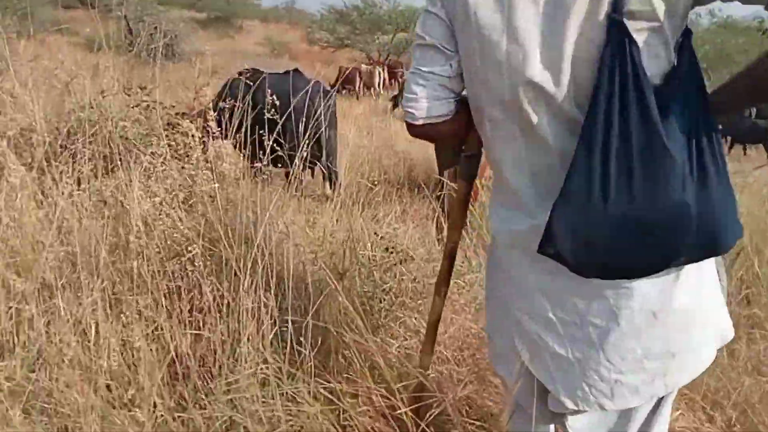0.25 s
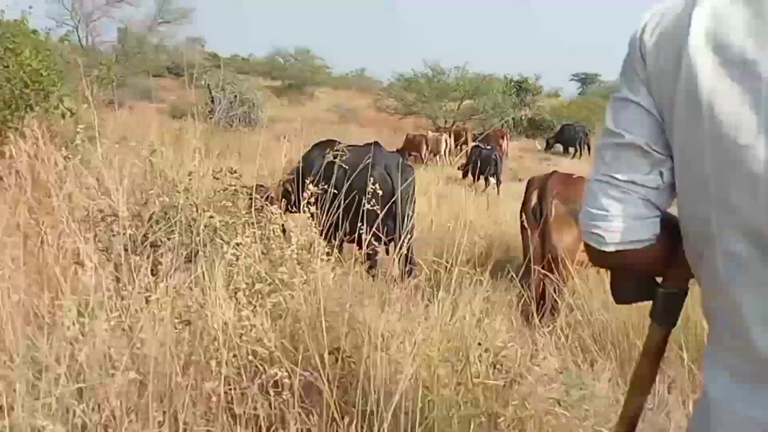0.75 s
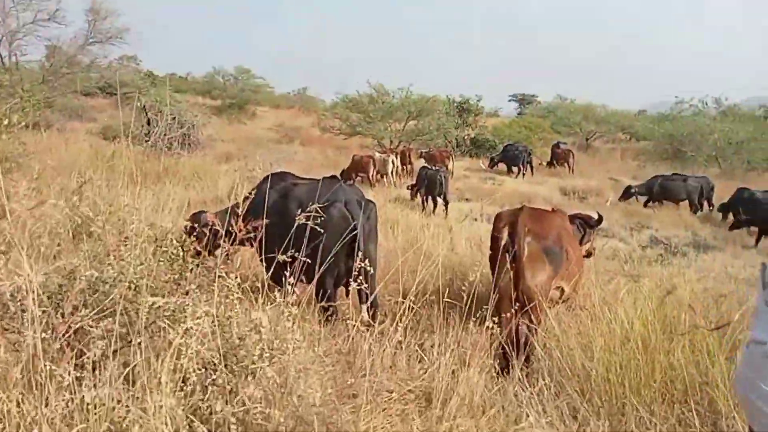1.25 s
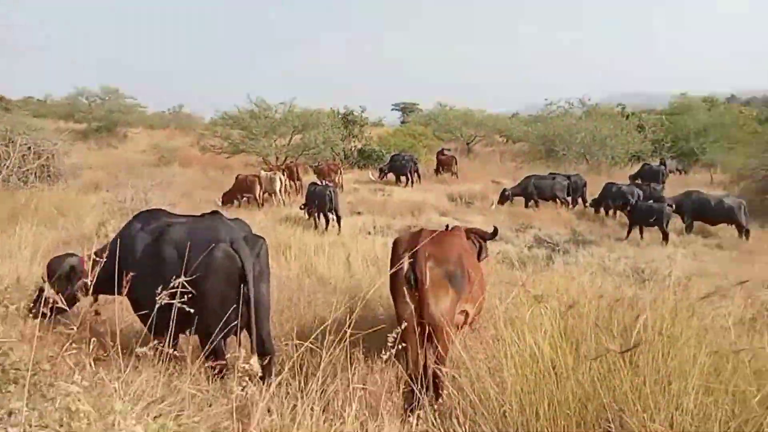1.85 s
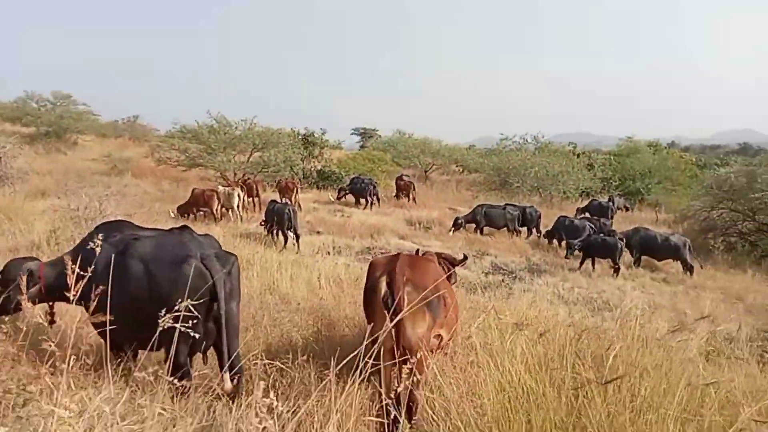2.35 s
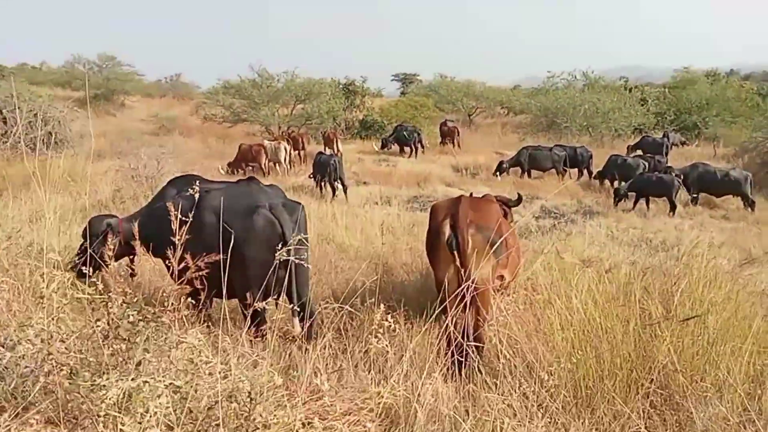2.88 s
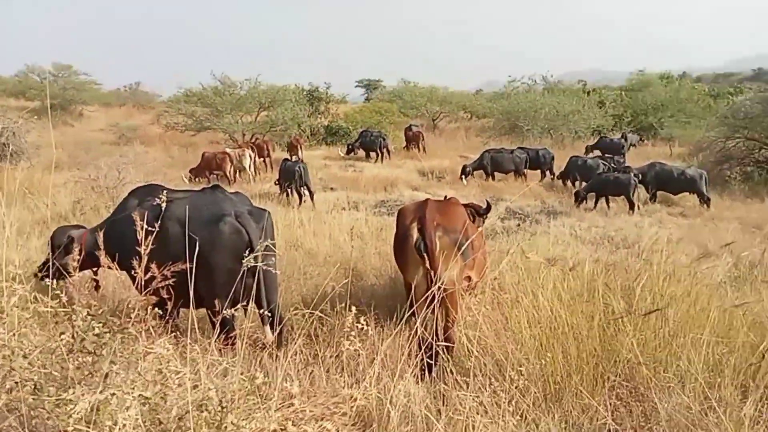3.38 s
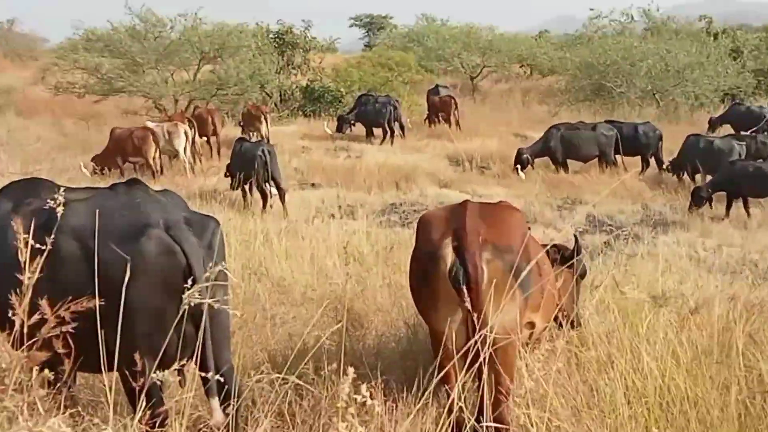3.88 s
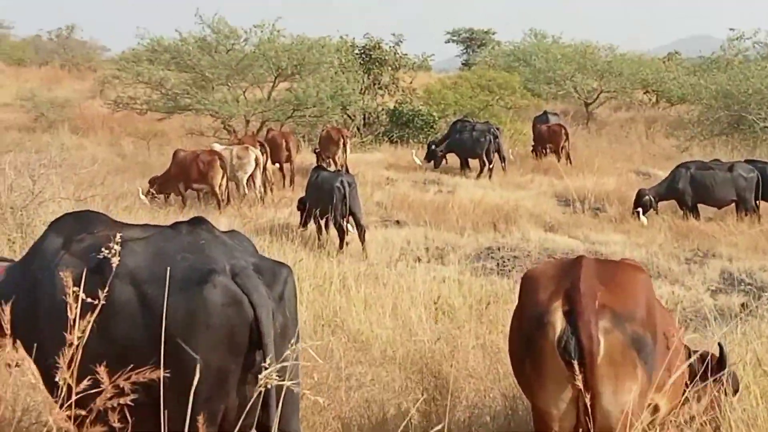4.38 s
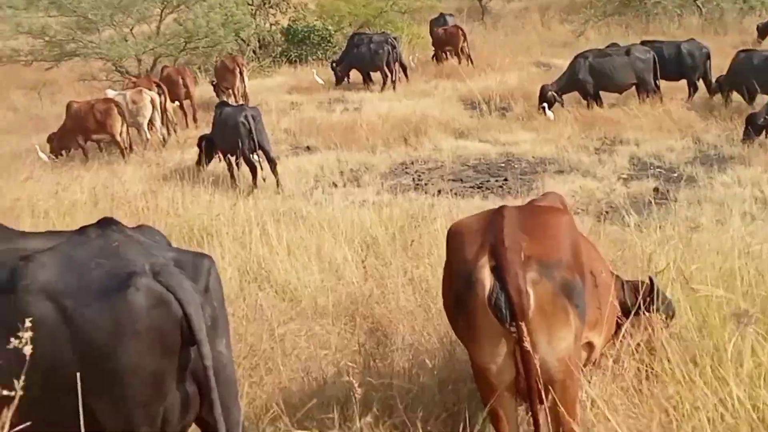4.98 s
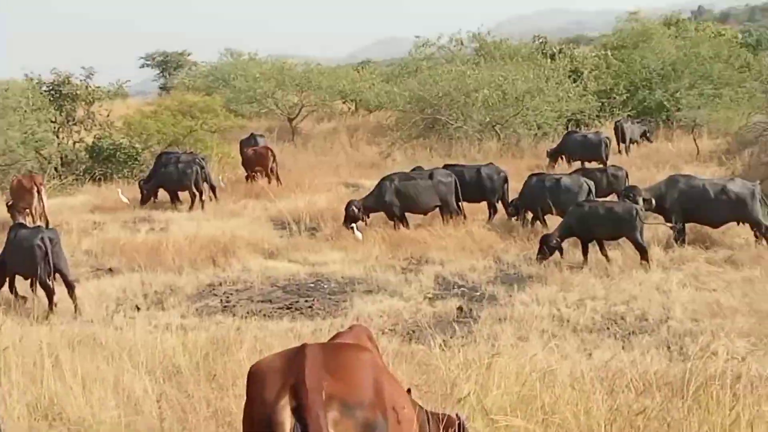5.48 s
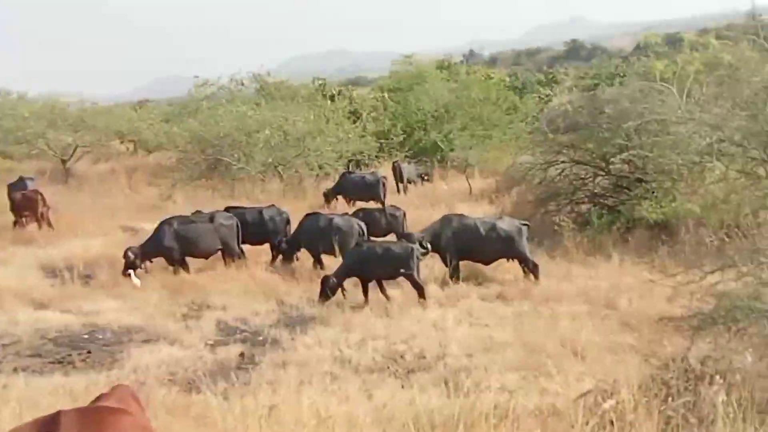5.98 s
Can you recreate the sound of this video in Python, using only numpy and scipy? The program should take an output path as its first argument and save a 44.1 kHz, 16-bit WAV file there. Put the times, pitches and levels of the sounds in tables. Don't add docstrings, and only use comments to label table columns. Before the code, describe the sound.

In an open dry pasture, brittle stalks rustle and snap around a walker's legs, while a fainter grass hiss suggests animals and another walker further off. Wind bumps come right at the start, brisk swishes follow, then a quieter stretch, and finally denser crackling, sharp stem ticks, dull treads and low puffs. The single microphone is close, dry and bright, essentially mono, with no animal calls.

```python
import sys
import numpy as np
from scipy import signal
from scipy.fft import rfft, irfft
from scipy.io import wavfile
from scipy.ndimage import uniform_filter1d

SR = 44100
rng = np.random.default_rng(int(sys.argv[2]) if len(sys.argv) > 2 else 0)


def digitize_waveform(pressure):
    field = np.atleast_2d(pressure).T
    bounded = np.clip(field, -1, 1)
    quanta = np.round(bounded * 32767).astype(np.int16)
    wavfile.write(sys.argv[1], SR, quanta)


def voltage_ratio(level):
    return 10 ** (np.asarray(level, float) / 20)


N = 274743


def evened(x):
    return x / np.sqrt(np.mean(x ** 2) + 1e-20)


def read(points, hz):
    f, value = np.transpose(points)
    return np.interp(np.log(hz + 1), np.log(f + 1), value)


def add(mix, s, sound):
    part = mix[round(s * SR):][:len(sound)]
    part += sound[:len(part)]


def drift(shape, wide, long):
    field = uniform_filter1d(rng.standard_normal(shape), wide, 0)
    return evened(uniform_filter1d(field, long, 1))


def wind():
    # t/s, level/dB
    strength = [(0.0, -75), (0.12, -57), (0.33, -68.5), (0.5, -73), (0.99, -68.5), (1.54, -77), (1.77, -70),
                (2.24, -71), (2.5, -67.5), (2.85, -70), (3.16, -69.5), (3.42, -64.5), (3.75, -66.5),
                (4.15, -62.5), (4.56, -62), (4.89, -62), (5.03, -58), (5.21, -66.5), (6.23, -60)]
    # f/Hz, level/dB per Hz
    rumble_colour = [(15, -40), (30, -10), (50, -7), (85, 0), (165, -2), (300, -4.5), (420, -9), (600, -13),
                     (1000, -82)]
    # centre t/s, peak level/dB, f/Hz, length/ms
    puffs = [(0.01, -40, 94, 16), (0.049, -55, 110, 67), (0.084, -41.5, 133, 11), (0.177, -33.5, 127, 6.4),
             (0.199, -48, 120, 33), (1.048, -48, 92, 20), (1.287, -52, 187, 32), (2.378, -52, 215, 10),
             (2.77, -59, 95, 44), (3.498, -46.5, 69.5, 20), (3.88, -56.5, 177, 52), (4.2, -54, 131, 40),
             (4.269, -41.5, 96, 45), (4.292, -44, 95, 15), (4.461, -58, 113, 45), (4.641, -54, 161, 48),
             (4.743, -49, 197, 49), (4.76, -44, 195, 15), (4.79, -50, 200, 25), (4.814, -46, 110, 18),
             (4.838, -37.5, 117, 13), (4.97, -49, 119, 20), (5.014, -37.5, 127, 14), (5.038, -42, 122, 13),
             (5.07, -44, 84, 19), (5.415, -54, 70, 40), (5.806, -38, 146, 10), (5.851, -54, 151, 37),
             (5.963, -46, 85, 31), (6.142, -39, 100, 17), (6.189, -50, 110, 31), (0.114, -51, 100, 30),
             (.215, -48, 85, 20), (.235, -49, 80, 27), (.27, -57, 60, 50), (.335, -55, 110, 31),
             (1.55, -60, 80, 32), (1.9, -60.5, 169, 60), (4.862, -49, 105, 35), (.5, -60, 65, 60)]
    low = irfft(rfft(rng.standard_normal(N)) * voltage_ratio(read(rumble_colour, np.fft.rfftfreq(N, 1 / SR))), N)
    power = uniform_filter1d(uniform_filter1d(low ** 2, 3000), 3000)
    low = low / np.sqrt(power)
    t = np.arange(N) / SR
    lumps_db = 1.8 * drift((1, N), 1, 4000)[0]
    out = voltage_ratio(0.5) * evened(low) * voltage_ratio(np.interp(t, *np.transpose(strength)) + lumps_db)
    for (s, db, hz, ms), turn in zip(puffs, rng.random(len(puffs))):
        swell = np.exp(-((t - s) * 2500 / ms) ** 2)
        out += voltage_ratio(db) * swell * np.cos(2 * np.pi * (hz * (t - s) + turn))
    return signal.sosfilt(signal.butter(2, 35, "high", fs=SR, output="sos"), out)


def snaps(per_s, spread_db):
    size = voltage_ratio(spread_db * np.minimum(rng.exponential(1, N), 5)) * rng.choice([-1., 1.], N)
    return evened(size * (rng.random(N) < per_s / SR))


def crackle(count=8):
    place = np.sqrt(np.linspace(0, 1, N // 2 + 1)) * count
    own = 0
    for k in range(count + 1):
        band = np.cos(np.pi / 2 * np.clip(place - k, -1, 1))
        own = own + band * rfft(snaps(1500, 3.3))
    own = evened(irfft(own, N))
    echo = rng.standard_normal(400) * voltage_ratio(-np.arange(400) / SR * 60 / 0.0083 - 5.0)
    echo[0] = 1
    clicks = voltage_ratio(-13.5) * snaps(2500, 2.6) + voltage_ratio(-16.5) * own
    near = signal.oaconvolve(clicks, echo / np.linalg.norm(echo))[:N]
    tail = rng.standard_normal(1200) * voltage_ratio(-np.arange(1200) / SR * 60 / 0.033)
    stiff = evened(signal.oaconvolve(snaps(60, 0.88), tail)[:N])
    return near + voltage_ratio(-26.0) * stiff + voltage_ratio(-6.5) * rng.standard_normal(N)


def stirring(t):
    # t/s, level/dB, open path past the port peak/dB, tread/dB
    far_grass = [(0.03, -34, -1, 0.1), (0.34, -38.5, -1.4, 0.55), (0.47, -41.5, -0.8, -0.6),
                 (0.76, -36.5, -3, 1), (0.95, -35.5, -3, 0.4), (1.21, -36.5, 0, -0.4), (1.52, -68, -5, -1),
                 (1.9, -40.5, -0.2, 0.3), (2.2, -38.5, 2.3, -0.54), (2.52, -43.5, 1.5, -0.5),
                 (3.12, -45, 2, -0.77), (3.67, -55.5, 2.5, 0.95), (4.07, -44, -0.5, -0.5),
                 (4.58, -38.5, -4, 1.1), (5.13, -35, -4.5, 0.06), (5.44, -42, 0.5, -0.2),
                 (6.07, -41, -22, 0.5), (6.18, -36, 1, 1)]
    far_follow = [.22, .29, .52, 1, 1.06]
    far_open = [0.17, 0.9, 1.4, 0, 0.9]
    far_heavy = [5.5, 0.5, 2.5, -4, -4]
    far_offset = [-2.94, 1, -1.13, 0.35, -0.66]
    # peak t/s, blades level/dB, length/ms, tips over blades/dB, leaves over blades/dB
    sweeps = [(0.124, -38, 74, -2.0, 1), (0.69, -38.5, 180, 0, -4.5), (0.85, -36.5, 78, -2, -5.5),
              (0.93, -32.5, 110, 1.3, -3.5), (1.04, -37, 120, -3, -4.5), (1.277, -31.5, 88, -3, -3.5),
              (1.483, -36, 310, -2.4, -3), (1.763, -33, 73, 4, -7), (1.943, -46, 200, 10, 5),
              (2.3, -44, 48, 8, 2), (2.43, -37.5, 30, 6, -6), (2.478, -31, 72, 5, -7),
              (2.52, -35.5, 45, 5, -5), (2.565, -42, 60, 1, -4), (2.812, -43, 12, -3.9, -5),
              (2.7, -49, 45, 0, 2), (3.265, -46, 37, 2, 6), (3.33, -41.5, 86, 1, 1.5),
              (3.59, -38, 250, -2.5, -2.8), (3.72, -45, 40, -3, -6), (3.89, -43.5, 75, -7, 4),
              (4.053, -44, 95, -3, 4.5), (4.235, -44.5, 60, -12, 6.5), (4.3, -38, 150, -14, -0.5),
              (4.432, -43.5, 46, -3, 3), (4.614, -34.5, 120, -2, -4.5), (4.77, -37.5, 72, -8, -3),
              (4.856, -33, 32, 1, 1), (4.9, -36, 168, 6.5, 5.5), (5.04, -38, 40, -4, -6),
              (5.1, -36.5, 97, -10, -5), (5.234, -42, 93, 3, 8.5), (5.38, -36, 56, -7, -2),
              (5.564, -44, 122, 12, 11.5), (5.832, -41.5, 194, 9.5, 9), (6.13, -40, 18, 0, -5),
              (6.167, -40, 74, 5, 2)]
    at, level, opening, tread = np.transpose(far_grass)
    mean_db = -38
    far_db = mean_db + np.outer(far_follow, np.interp(t, at, level) - mean_db)
    far_db += np.outer(far_open, np.interp(t, at, opening))
    far_db += np.outer(far_heavy, np.interp(t, at, tread))
    far_db += np.reshape(far_offset, (-1, 1))

    s, db, ms, tips_db, leaves_db = np.transpose(sweeps)
    u = (t - s[:, None]) * 1000 / ms[:, None]
    settle = 0.69 * (ms[:, None] / 100)
    swell = np.exp(-2 * abs(np.where(u > 0, u / settle, u)) ** 1.6)
    litter_db = 0.17 * leaves_db - 6
    stems_db = 0.55 * leaves_db + 1.55
    near_db = db + np.array([litter_db, stems_db, leaves_db, 0 * db, tips_db])
    return 10 * np.log10(voltage_ratio(far_db) ** 2 + voltage_ratio(near_db) ** 2 @ swell)


def grass():
    # f/Hz, level/dB per Hz
    grass_colour = [(100, -6.5), (230, -17.5), (680, -14), (1350, -15.5), (2200, -12.5), (4200, -11.5),
                    (5300, -5), (6700, -7.5), (7900, -3.5), (9300, 1), (10300, -2.5), (11600, -5.5),
                    (13300, -5), (15600, -6)]
    layer_hz = [600, 1800, 5200, 9300, 13700]
    # t/s, f/Hz, height over its usual level/dB
    port_peak = [(0, 9750, -4.3), (.3, 9700, -1), (.5, 10000, -0.5), (.7, 9300, -1), (.92, 10000, 1.7),
                 (1.15, 10300, -3), (1.55, 9100, 1), (2.0, 10000, -5), (2.45, 9100, 1.4), (2.95, 9400, 1.4),
                 (3.4, 9700, 1.1), (3.85, 9497, -0.5), (4.3, 9400, -1.1), (4.9, 9460, -0.7),
                 (5.3, 8800, 1.8), (5.75, 9940, 4.1), (6.0, 9800, 1.8), (6.23, 9400, 2.5)]
    hz, t, z = signal.stft(crackle(), SR, nperseg=256, noverlap=192)
    z = z / np.sqrt((abs(z) ** 2).mean(1, keepdims=True))
    layers = stirring(t)
    weights = np.transpose([np.interp(hz, layer_hz, row) for row in np.eye(5)])

    at, peak_hz, height_db = np.transpose(port_peak)
    peak_hz = np.interp(t, at, peak_hz)
    port_width_hz = 900
    bump = np.exp(-((hz[:, None] - peak_hz) / port_width_hz) ** 2)
    height_db = np.interp(t, at, height_db) * bump
    slide = (layer_hz[3] - peak_hz) * np.exp(-((hz[:, None] - layer_hz[3]) / 2500) ** 2)

    patches = 0.85 * drift(z.shape, 6, 40) + 0.5 * drift(z.shape, 90, 9)
    patches += 0.6 * drift(z.shape, 250, 16) + 1.5 * drift(z.shape, 2, 45)
    z = z * voltage_ratio(read(grass_colour, hz[:, None] + slide) + height_db + patches)
    band = (hz > 7000) & (hz < 12000)
    z /= np.sqrt(4 / 3 * (abs(z[band]) ** 2).sum(0).mean())
    z *= voltage_ratio(weights @ layers)
    rustle = voltage_ratio(-2.5) * signal.istft(z, SR, nperseg=256, noverlap=192)[1][:N]
    return signal.sosfilt(signal.butter(3, 170, "high", fs=SR, output="sos"), rustle)


def knocks():
    # t/s, peak level/dB, f/Hz, ring time/ms
    blows = [(0.1007, -39, 870, 16), (.257, -48.5, 640, 46), (.98, -49, 670, 57), (1.2795, -38, 1290, 13),
             (1.284, -44, 1700, 12), (1.291, -52, 700, 9.2), (1.331, -45, 1180, 93),
             (1.755, -44.5, 930, 44), (2.4833, -37, 900, 8), (2.4853, -39, 805, 6.8),
             (2.4898, -31, 1000, 5), (2.4944, -33, 970, 8.5), (2.4983, -40, 1500, 8),
             (3.444, -41.5, 368, 35), (3.479, -42.5, 1140, 10), (3.527, -44, 417, 21),
             (3.589, -41, 1300, 23), (3.605, -45.5, 410, 37), (3.634, -41, 1230, 17), (3.868, -55, 620, 14),
             (4.222, -47, 750, 35), (4.581, -31, 1020, 7), (4.603, -38, 1140, 16), (4.6205, -35, 1070, 17),
             (4.73, -42.5, 1310, 28), (4.758, -35, 590, 11), (5.191, -41.5, 483, 17),
             (5.842, -45.5, 740, 39), (6.0193, -37, 654, 4.2), (6.03, -45, 920, 11), (1.322, -47, 1040, 40),
             (1.493, -53, 780, 140), (1.775, -51, 900, 30), (3.465, -49, 380, 25), (3.479, -48, 380, 20),
             (3.528, -43, 2220, 15), (3.58, -49, 320, 29), (3.592, -50, 400, 28), (2.4902, -39, 1700, 3.6),
             (.018, -55, 600, 22), (.5615, -49, 1150, 18), (5.3725, -45, 1250, 15)]
    out, t = np.zeros(N), np.arange(4000) / SR
    for s, db, hz, ms in blows:
        grit = evened(signal.lfilter(*signal.iirpeak(hz, 1.1, SR), rng.standard_normal(len(t))))
        shape = voltage_ratio(-60000 * t / ms) * (1 - np.exp(-t * hz / 0.7))
        add(out, s, voltage_ratio(db) * (np.sin(2 * np.pi * hz * t) + 0.25 * grit) * shape / shape.max())
    return out


def clumps(table):
    out, t = np.zeros(N), np.arange(16384) / SR
    hz = np.fft.rfftfreq(16384, 1 / SR) + 1
    for s, db, centre_hz, octaves, ms in table:
        a, b = rng.standard_normal((2, len(t)))
        band = np.exp(-(1.4 * np.log2(hz / centre_hz) / octaves) ** 2)
        grit = irfft(rfft(a * voltage_ratio(3.5 * b)) * band)
        u = 3000 * t / ms
        add(out, s, voltage_ratio(db) * evened(grit) * u * np.exp(1 - u))
    return out


def scuffs():
    # start t/s, level/dB, centre f/Hz, width/octaves, length/ms
    drags = [(0.091, -49, 3300, .5, 19), (0.097, -51, 1500, 2.1, 27), (1.274, -43, 900, 6.2, 31),
             (1.741, -52.5, 1000, 2.4, 100), (2.177, -41, 8360, 0.26, 20), (2.176, -48, 3500, 0.54, 19),
             (2.478, -43.5, 1100, 1.4, 41), (3.5, -56.5, 350, 1.7, 83), (3.864, -55.5, 850, 1.8, 40),
             (4.18, -56.5, 1226, 0.094, 89), (4.41, -45, 5470, 0.27, 40), (5.355, -42, 4900, 0.56, 40),
             (5.35, -36, 9000, 0.23, 31), (5.739, -50, 1700, 1.1, 16), (4.418, -46.5, 1970, 0.94, 34),
             (4.67, -53.5, 510, 1.7, 170), (4.842, -40.5, 4200, 1.4, 8), (4.82, -54, 430, 1.1, 68),
             (5.131, -57, 490, 0.67, 19), (5.356, -48, 2820, 1.6, 20), (2.486, -54, 1700, 1.3, 46),
             (1.75, -49, 2300, 0.4, 24), (5.8, -52, 580, 1.1, 49), (6.015, -52, 700, 1.6, 21),
             (.16, -52, 6600, .3, 320), (.35, -51, 11200, .15, 180), (.38, -45.5, 6900, 0.72, 190),
             (.62, -45.5, 7340, .2, 140), (.6, -43, 14900, .1, 150), (1.0, -61, 1510, 0.83, 310),
             (1.12, -50, 7160, .25, 170), (1.519, -52.5, 3160, 0.42, 115), (1.69, -54, 2700, .5, 69),
             (1.85, -54.5, 1300, 1.1, 86), (1.849, -47, 6000, 0.57, 180), (2.62, -60, 1140, 1.5, 390),
             (2.68, -54, 4350, 0.34, 150), (2.8, -66, 380, 1.5, 250), (5.75, -51, 4340, 0.39, 320),
             (6.06, -47, 10200, .2, 150)]
    return clumps(drags)


def ticks():
    # t/s, peak level/dB, ring f/Hz, low part level/dB
    stems = [(1.966, -15, 12500, -26), (2.178, -28, 8310, -5), (2.2095, -35, 9500, -20),
             (2.229, -24, 9200, -30), (2.436, -17.5, 9600, -17), (2.4605, -21, 9230, -27),
             (2.6246, -29, 10500, -30), (2.751, -29, 8900, -7), (2.809, -24, 9200, -30),
             (3.321, -31, 9500, -12), (3.525, -26, 9000, -23), (3.8932, -30, 9610, -25),
             (3.8934, -31, 5800, -12), (4.111, -30, 9510, -18), (4.3437, -27.5, 9210, -19),
             (4.841, -21, 8400, -10), (4.8574, -20, 10700, -14), (5.092, -25, 9400, -20),
             (5.134, -23, 8650, -21), (5.397, -29, 4700, -2), (5.445, -37, 2980, 1),
             (5.5966, -29, 9400, -5), (5.607, -30, 9400, -15), (5.837, -21, 13300, -22),
             (6.124, -24, 9200, -20), (6.173, -18, 9300, -18), (6.2244, -25, 8100, -28),
             (.21, -28, 13800, -25), (1.966, -28, 5560, -22), (1.476, -33, 9300, -20),
             (1.2995, -31, 9500, -15), (.578, -36, 8500, -22), (.1804, -30, 9800, -25),
             (4.1123, -38, 5500, -12), (4.394, -36, 5170, 0), (4.406, -33, 5300, 2),
             (4.4176, -29, 5555, -12), (4.4192, -32, 5500, -10), (4.4239, -32, 5700, -12),
             (4.4353, -32.5, 2150, 0), (4.8042, -33, 5770, -14), (4.8446, -23, 5900, 0),
             (4.8303, -32, 9600, -25), (4.883, -25, 9500, -20), (5.3711, -20, 9130, -15),
             (5.5966, -28.5, 5000, -14), (4.235, -29, 5000, 0), (3.327, -34, 9700, -20)]
    out, t = np.zeros(N), np.arange(1500) / SR
    ring_ms = 7
    for s, db, hz, low_db in stems:
        draw = rng.standard_normal((2, len(t)))
        ring = signal.iirpeak(hz, 3.6, SR)
        high = signal.lfilter(*ring, signal.lfilter(*ring, draw[0]))
        low = signal.lfilter(*signal.butter(2, [2000, 6500], "band", fs=SR), draw[1])
        shape = voltage_ratio(-60000 * t / ring_ms) * np.minimum(t / 0.0004, 1)
        burst = (evened(high) + voltage_ratio(low_db) * evened(low)) * shape
        add(out, s + 0.0012, voltage_ratio(db) * burst / abs(burst).max())
    return out


def crushes():
    # start t/s, level/dB, centre f/Hz, width/octaves, length/ms
    treads = [(4.662, -54, 480, .35, 60), (4.695, -52, 390, .5, 110), (4.75, -52, 520, .6, 30),
              (4.845, -56, 450, 1.1, 50), (4.135, -57, 450, .9, 70), (4.185, -55, 410, .4, 40),
              (2.895, -61, 480, 1.2, 50), (2.74, -55, 1900, .4, 50), (2.484, -50, 2000, .7, 22),
              (3.385, -58, 700, .8, 50), (.657, -60, 2600, .8, 30), (5.76, -56, 420, .8, 30),
              (6.09, -60, 330, .9, 90), (1.54, -60, 570, .6, 40), (1.825, -57, 650, .6, 30),
              (.77, -61, 300, .6, 40), (4.3, -57, 320, .6, 50), (3.17, -57, 2050, .3, 40),
              (5.23, -60, 550, .8, 100)]
    return clumps(treads)


def scene():
    return np.tile(wind() + grass() + knocks() + scuffs() + ticks() + crushes(), (2, 1))


def top_cut(x):
    return signal.sosfilt(signal.butter(12, 15500, fs=SR, output="sos"), x)


def record(dry):
    # t/s, from f/Hz, to f/Hz, level/dB
    slips = [(.522, 5500, 7200, -55), (.522, 11500, 15300, -51), (.615, 6240, 9200, -48),
             (1.451, 6300, 12000, -43), (1.52, 12300, 14000, -54), (1.962, 4830, 14000, -53),
             (2.054, 5160, 6350, -53), (3.076, 6200, 7800, -61), (3.076, 11000, 12500, -56),
             (3.122, 6800, 11200, -52), (4.005, 4500, 5900, -57), (4.005, 11500, 14000, -55),
             (4.051, 7600, 12540, -45), (5.027, 4300, 5300, -55), (5.027, 8880, 11800, -39),
             (5.468, 4000, 5200, -59), (5.816, 12900, 14800, -46)]
    side, hz = np.zeros(N), np.fft.rfftfreq(2048, 1 / SR)
    frame = signal.windows.kaiser_bessel_derived(2048, 4 * np.pi)
    first = 461
    for s, lo_hz, hi_hz, db in slips:
        fill = evened(irfft(rfft(rng.standard_normal(2048)) * (hz > lo_hz) * (hz < hi_hz)))
        start = first + 1024 * round((s * SR - first) / 1024 - 1)
        add(side, start / SR, voltage_ratio(db) * fill * frame ** 2)
    return top_cut(dry + side * [[1], [-1]])


dry = scene()
out = record(dry)
digitize_waveform(out)
```